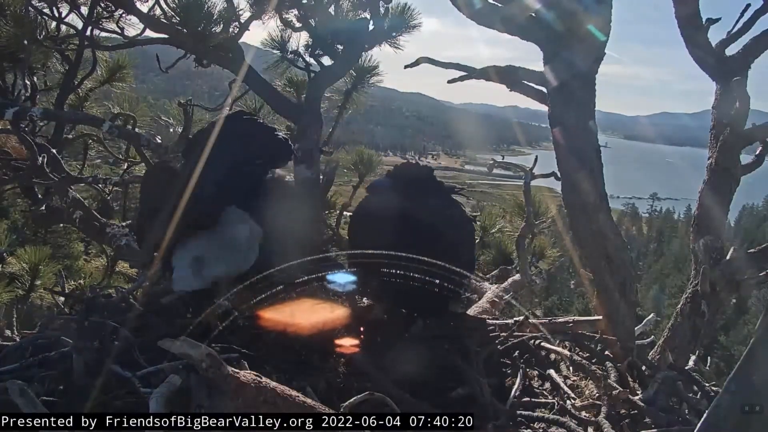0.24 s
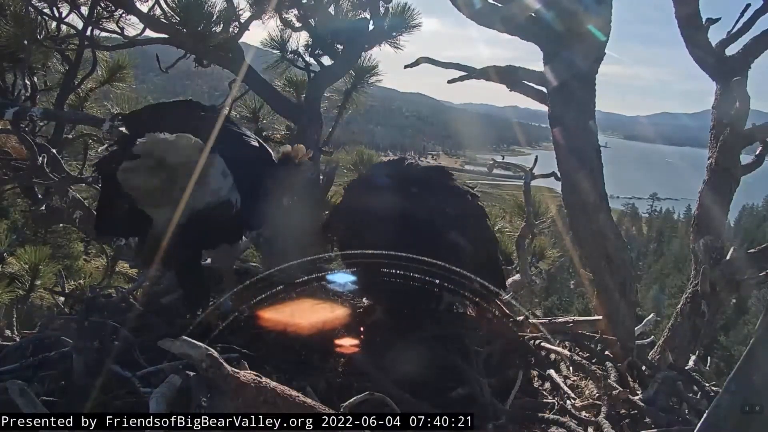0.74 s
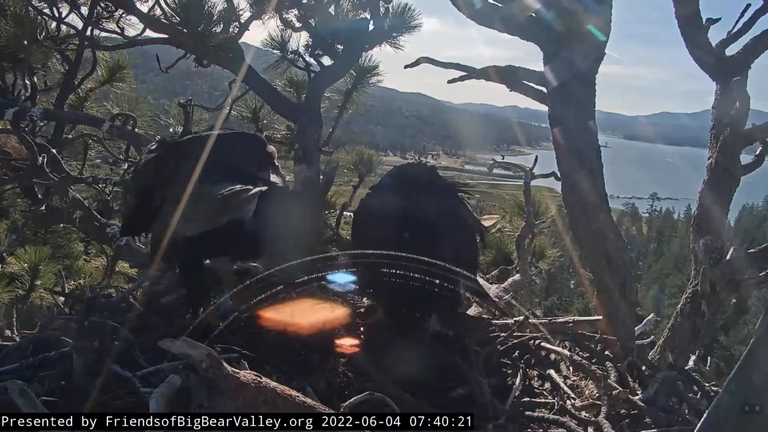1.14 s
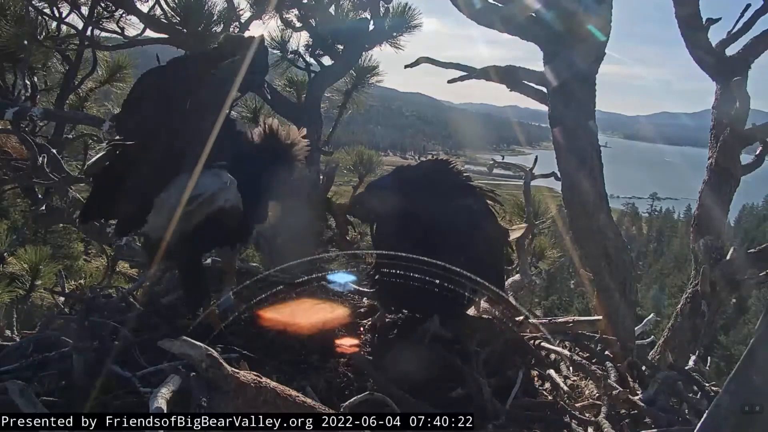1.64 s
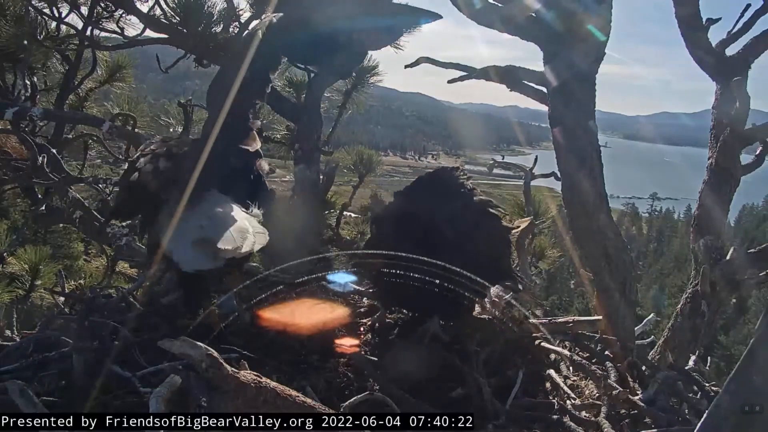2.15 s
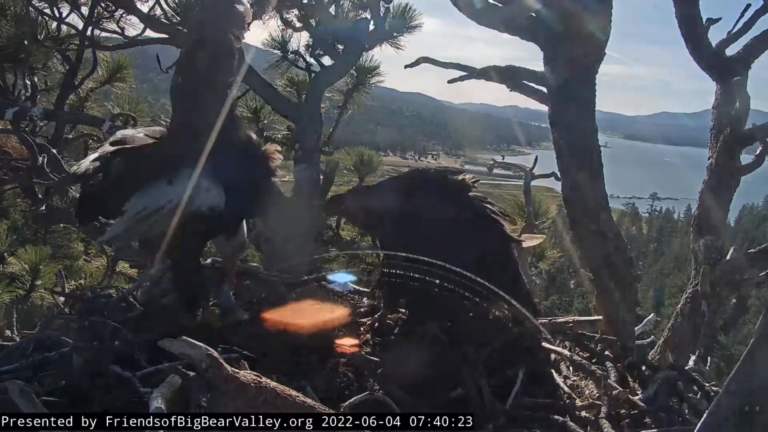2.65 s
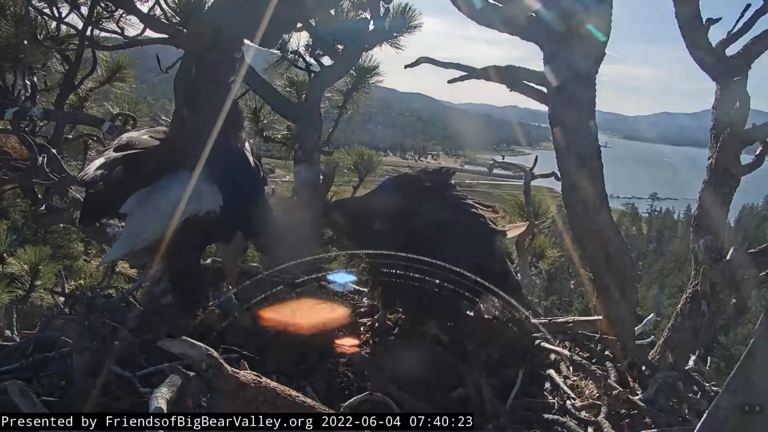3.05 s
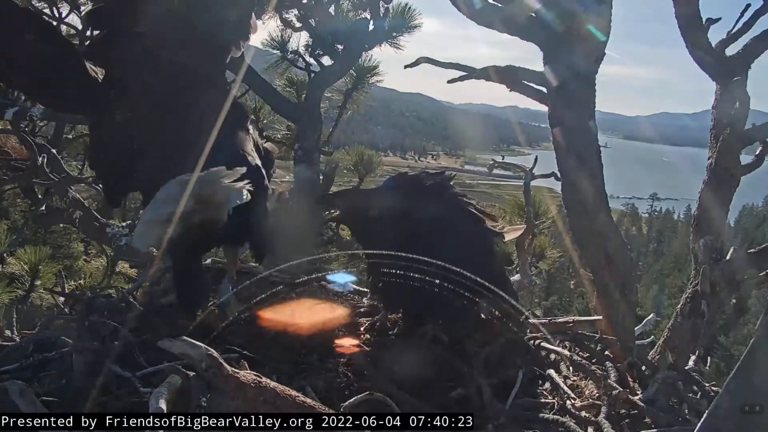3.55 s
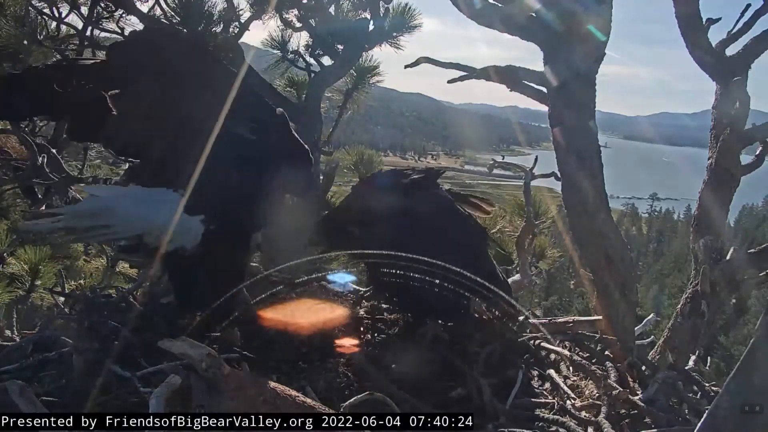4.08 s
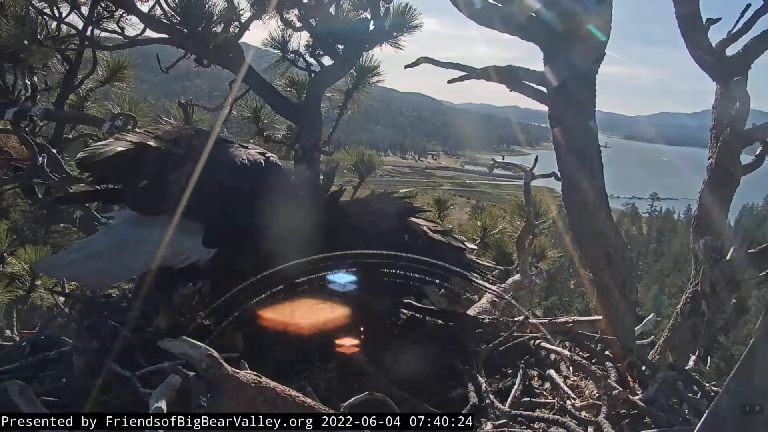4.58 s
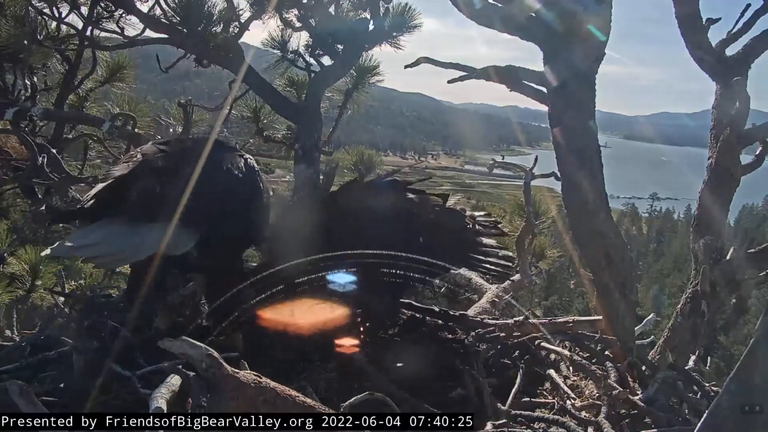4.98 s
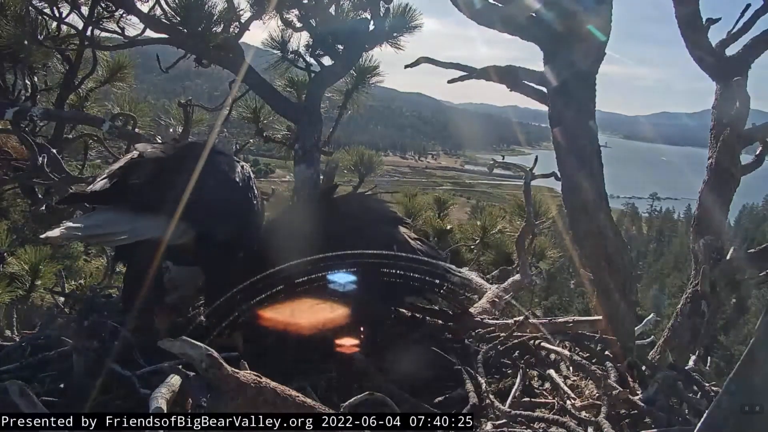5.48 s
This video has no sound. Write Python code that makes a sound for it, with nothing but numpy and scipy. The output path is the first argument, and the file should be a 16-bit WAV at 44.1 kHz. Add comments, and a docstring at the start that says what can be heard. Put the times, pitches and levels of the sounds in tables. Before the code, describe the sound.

A young eagle on a treetop nest squeals over and over, each shrill hoarse cry swooping up and snapping off in a yelp.

```python
"""Long begging squeals from a young eagle on a treetop nest: they swoop up, break to a higher, hoarse register
and drop off in a yelp. We start inside one squeal and leave inside another. Twigs crack under the birds, the
forest returns a faint echo, small birds chirp far off and a low rumble drifts underneath. The eagle is a near
sine, rasp noise and steady side notes; twigs are ringing noise bursts, chirps falling sines, rumble and hiss
shaped noise. The nest microphone's sample clock slips, which adds faint mirror whistles to every squeal."""
import sys
import numpy as np
from scipy import signal
from scipy.fft import rfft, irfft
from scipy.io import wavfile
from scipy.ndimage import uniform_filter1d, map_coordinates

SR = 44100
rng = np.random.default_rng(int(sys.argv[2]) if len(sys.argv) > 2 else 0)


def to_wav(s):
    """Save 16-bit WAV."""
    ch = np.atleast_2d(s).T  # columns
    pcm = np.round(np.clip(ch, -1, 1) * 32767)  # PCM
    wavfile.write(sys.argv[1], SR, pcm.astype(np.int16))


N = 252252
TIME = np.arange(N) / SR

# All levels in the tables are relative; pitches are centres about which the voices waver.
# held note of each squeal in turn: (time [s], pitch [Hz], whistle level [dB], rasp level [dB])
NOTE_1 = [(0.0, 4506, -20.5, -21), (0.033, 4386, -21, -27.5)]
NOTE_2 = [(0.383, 3161, -12.5, -26.5), (0.432, 3560, -30, -67), (0.452, 3566, -17, -62.0),
          (0.511, 3686, -22.5, -61), (0.519, 4110, -28.5, -44), (0.546, 4022, -21, -51),
          (0.598, 3991, -23.5, -24.5), (0.724, 3964, -16, -36.0), (0.751, 4127, -26.5, -28),
          (0.883, 4203, -28, -35.5), (0.91, 4208, -16.5, -22), (0.965, 4360, -18, -30)]
NOTE_3 = [(1.311, 3634, -20.5, -36.5), (1.349, 3733, -28.0, -32), (1.402, 3610, -20, -56.0),
          (1.434, 3630, -27.5, -26.5), (1.483, 3722, -31, -25.5), (1.546, 3561, -25.5, -27.5),
          (1.578, 3614, -19, -28.5), (1.6, 3958, -33.0, -29.0), (1.61, 3833, -23.5, -30),
          (1.746, 3847, -17.0, -23.5), (1.836, 4130, -22.5, -28), (1.908, 4206, -16, -25.5)]
NOTE_4 = [(2.272, 3106, -9.5, -29.5), (2.285, 3457, -14, -31), (2.321, 3270, -22.5, -29.0),
          (2.352, 3286, -12.5, -69), (2.382, 3330, -18, -25), (2.412, 3227, -17.5, -47),
          (2.514, 3446, -11, -47.5), (2.53, 3760, -22.5, -31), (2.664, 3856, -25.5, -30.5),
          (2.735, 3757, -24.5, -32), (2.8, 4023, -16, -41), (2.831, 3904, -22, -30.5)]
NOTE_5 = [(3.191, 2830, -15.5, -41), (3.198, 3378, -15, -28), (3.24, 3277, -23.5, -40),
          (3.272, 3092, -16.5, -52.5), (3.34, 3602, -11.0, -68), (3.37, 3690, -26.5, -37),
          (3.377, 3831, -20, -33), (3.505, 3945, -21, -28), (3.564, 4150, -39.5, -22.5),
          (3.612, 4327, -33, -19.5), (3.637, 4430, -40.5, -26.0), (3.714, 4372, -26, -30.0)]
NOTE_6 = [(3.973, 3993, -27.5, -29), (4.028, 3573, -27, -37.5), (4.081, 4325, -38.5, -39),
          (4.096, 4420, -48.5, -42), (4.103, 4058, -38, -46), (4.133, 3975, -24.5, -36.0),
          (4.153, 4614, -41, -34.5), (4.211, 4540, -43, -36), (4.308, 4326, -29, -30.5),
          (4.37, 4310, -23, -44.5), (4.439, 4513, -37, -27)]
NOTE_7 = [(4.649, 3379, -32.5, -36), (4.697, 3452, -23, -53), (4.705, 3408, -29.5, -33.5),
          (4.722, 3765, -24.5, -35), (4.754, 3701, -29, -38), (4.796, 3513, -23, -32),
          (4.842, 3672, -29, -36.5), (4.934, 3894, -18, -28.5), (4.972, 3853, -29.5, -31)]
NOTE_8 = [(5.284, 2864, -18, -49), (5.313, 2866, -15, -53), (5.339, 2678, -24, -51), (5.37, 2620, -18, -61),
          (5.43, 2752, -30, -68), (5.455, 2773, -22, -52), (5.463, 3202, -29, -39),
          (5.506, 3349, -18.5, -35), (5.592, 3389, -17.5, -44), (5.6, 3751, -29, -40),
          (5.712, 3856, -27, -37)]
HELD_NOTES = [NOTE_1, NOTE_2, NOTE_3, NOTE_4, NOTE_5, NOTE_6, NOTE_7, NOTE_8]
# closing yelps at their loudest; the last squeal has none:
# (time [s], pitch [Hz], whistle level [dB], rasp level [dB], release [s])
YELPS = [(.058, 2926, -8, -30, 0.011), (.988, 2857, -10, -22.5, 0.025), (1.93, 2740, -6, -22, 0.045),
         (2.847, 3612, -10, -22, 0.048), (3.734, 3349, -4.5, -46, 0.0295), (4.46, 3134, -9.5, -21.5, .03),
         (4.987, 3209, -10.5, -20.5, 0.025)]
# scratch, then catch of the tone; the first squeal has none:
# (time [s], scratch level [dB], catch delay [s], catch level [dB], pitch unsteadiness that follows [1 = usual])
OPENINGS = [(.328, -29.5, 0.025, -14.5, .8), (1.271, -27, 0.023, -12, 1.29),
            (2.221, -28, 0.031, -7.5, 0.89), (3.142, -34.5, .03, -15, 0.78),
            (3.929, -34.5, .018, -15, 2.615), (4.611, -34.5, 0.024, -34, 1.065),
            (5.245, -40.5, 0.026, -22.5, 1.26)]
# hoarse bands of the rasp while the whistle is at MID_PITCH_HZ: (frequency [Hz], width [Hz], level [dB])
RASP_BANDS = [(3638, 90, -1), (3347, 160, -6), (2922, 140, -4), (2662, 110, -17.5), (2320, 95, -21),
              (1845, 1400, -38.5)]
# air rushing through the open beak: (frequency [Hz], density [dB per Hz])
BEAK_AIR = [(200, -44), (600, -10), (1200, -17), (2000, -8.5), (3000, -6.5), (3900, -18.5), (4600, -17),
            (7000, -27)]
# reflections from trunks and slopes: (delay [s], level [dB])
ECHOES = [(.0028, -40), (.0071, -14.5), (0.0152, -16.5)]
# low rumble: (frequency [Hz], density [dB per Hz])
LOW_RUMBLE = [(25, -32), (50, -21), (80, -6.5), (115, 0.5), (160, -2.5), (200, -8), (260, -23.5),
              (400, -30.5), (700, -29), (1500, -31.5), (3000, -37.5)]
# hiss of the microphone: (frequency [Hz], density [dB per Hz])
MICROPHONE_HISS = [(300, -19), (2000, -3.5), (5000, -3), (9000, -1), (13000, -1), (14500, -23),
                   (16000, -86)]
# faint dry ticks: (time [s], level [dB])
TICKS = [(0.1486, -15.5), (1.378, -16.5), (3.0178, -23.5), (3.8384, -22.5), (4.6698, -17), (5.0778, -10)]
# colour of the opening scratch: (frequency [Hz], density [dB per Hz])
SCRATCH_COLOUR = [(250, -10), (600, 7), (1100, 3), (1700, 11.5), (2900, -7), (3600, 3), (6000, -37)]
# steady note pairs from the second side of the syrinx:
# (start [s], end [s], upper pitch [Hz], upper level [dB], lower pitch [Hz], lower level [dB])
SECOND_VOICE = [(0.57, 0.672, 3610, -26, 2980, -39), (0.674, 0.796, 2943, -35, 2665, -33.5),
                (0.842, 0.926, 3654, -26.5, 2950, -38), (1.425, 1.609, 3060, -30.5, 2945, -31.5),
                (1.62, 1.914, 3606, -38, 2878, -29.5), (2.527, 2.837, 3365, -27.5, 2867, -35),
                (3.523, 3.678, 3577, -25, 3000, -24.5), (3.971, 4.425, 3700, -40, 3288, -45.5),
                (4.771, 4.951, 3274, -34.5, 2580, -35), (5.013, 5.055, 3216, -23.5, 2540, -36.5)]
# twig cracks: (time [s], level [dB])
CRACKS = [(1.701, -11.5), (1.722, -18), (1.748, -8), (1.771, -12.5), (1.775, -20), (1.787, -31),
          (1.802, -14), (2.378, -21.5), (2.599, -24), (4.062, -34)]
# resonances of a snapping twig: (frequency [Hz], width [Hz], level [dB])
TWIG_RESONANCES = [(636, 570, -8), (1250, 960, -6), (2000, 430, -1), (2820, 190, 5)]
# chirps of far birds: (time [s], pitch [Hz], level [dB])
CHIRPS = [(4.105, 5550, -44.5), (4.214, 5460, -41), (4.355, 5810, -46), (4.491, 5400, -44.5),
          (4.66, 5370, -47), (5.052, 1367, -45), (5.154, 1383, -37), (5.401, 1776, -39),
          (5.535, 1350, -38.5), (5.68, 1750, -41)]

MID_PITCH_HZ = 4002
SILENT_DB = -90
# swoop: swells from a low pitch to the catch and stays strong for a moment; dB relative to the catch
SWOOP_HZ, CATCH_HZ, CATCH_RISE_HZ_PER_S = 2400, 2854, 11000
ATTACK_S, ATTACK_DB, CATCH_HOLD_S, CATCH_SAG_DB, CATCH_RASP_DB = .012, 23, .008, 1, -25
# yelp: drops to the bottom of the voice, weakens and dies, whistle still above the rasp;
# bottom levels relative to the whistle at its peak
YELP_FALL_HZ_PER_S, BOTTOM_HZ, BOTTOM_DB = 50000, 2536, -13
BOTTOM_RASP_DB, RELEASE_DB = -20, 42
# the microphone's clock and the upper limit of its band
CLOCK_HZ, CUTOFF_HZ = 48000, 15900


def from_db(db):
    """Decibels to gain."""
    return 10 ** (np.asarray(db) / 20)


def rms_one(x):
    """Scale to unit power."""
    return x / np.sqrt(np.mean(np.abs(x) ** 2) + 1e-20)


def drift(rate_hz):
    """Smooth random wobble of spread 1: noise through two equal low-pass poles."""
    pole = np.exp(-2 * np.pi * rate_hz / SR)
    noise = rng.standard_normal(N + SR)
    # the first second only settles the filter
    return rms_one(signal.lfilter([1], [1, -2 * pole, pole * pole], noise)[SR:])


def bounded_drift(rate_hz):
    """A wobble whose rare large swings are rounded off."""
    return 2 * np.tanh(drift(rate_hz) / 2)


def coloured_noise(spectrum):
    """Noise of unit power with the given spectrum."""
    hz, level_db = np.transpose(spectrum)
    bins = np.maximum(np.fft.rfftfreq(N, 1 / SR), 1)
    gain = from_db(np.interp(np.log(bins), np.log(hz), level_db))
    return rms_one(irfft(rfft(rng.standard_normal(N)) * gain, N))


def resonate(x, hz, width_hz):
    """One resonance with gain 1 on top."""
    r = np.exp(-np.pi * width_hz / SR)
    numerator = np.array([1, 0, -1]) * (1 - r * r) / 2
    denominator = [1, -2 * r * np.cos(2 * np.pi * hz / SR), r * r]
    return signal.lfilter(numerator, denominator, x)


def phase_of(hz):
    """Running phase of a moving frequency."""
    return 2 * np.pi * np.cumsum(hz) / SR


def eagle(whistle_db=-0.7, rasp_db=-2.0):
    """Two voices, opening scratches and a rasp whose share sets the hoarseness."""
    pitch, tone_gain, rasp_gain = squeal_controls()
    hoarse = rasp_gain / (np.hypot(tone_gain, rasp_gain) + 1e-6)
    voices = from_db(whistle_db) * tone_gain * whistle(pitch, hoarse) + second_voice()
    return voices + from_db(rasp_db) * rasp_gain * rasp(pitch) + scratches()


def squeal_controls():
    """Pitch, whistle gain and rasp gain: swoops, held notes and yelps joined in order of time."""
    swoops = [swoop(s, delay_s, db) for s, _, delay_s, db, _ in OPENINGS]
    yelps = [yelp(*row) for row in YELPS]
    course = np.vstack(swoops + HELD_NOTES + yelps)
    s, pitch, whistle_db, rasp_db = course[np.argsort(course[:, 0])].T
    tone_gain = from_db(np.interp(TIME, s, whistle_db))
    rasp_gain = from_db(np.interp(TIME, s, rasp_db))
    return np.interp(TIME, s, pitch), tone_gain, rasp_gain


def whistle(pitch, hoarse, waver=0.00306, jitter=0.00844, hop=0.0149,  # shares of the pitch
            swell_db=2.16, stumble_db=4.5, shimmer_db=2.0, overtone_db=-39, slack_hz=2620, half_db=-6):
    """The syrinx sings a near sine; as it turns hoarse it shakes and hops between neighbouring pitches."""
    starts, *_, unsteadiness = np.transpose(OPENINGS)
    of_squeal = unsteadiness[np.maximum(np.searchsorted(starts, TIME) - 1, 0)]
    # the squashed drift lingers near two extremes, heard as hops
    hops = hop * np.tanh(2 * drift(49.6))
    unsteady = of_squeal * hoarse ** 2 * (jitter * drift(201.5) + hops)
    phase = phase_of(pitch * (1 + waver * drift(36.2) + unsteady))
    hoarse_shake_db = hoarse * (stumble_db * bounded_drift(69) + shimmer_db * drift(99))
    shake = from_db(swell_db * drift(74) + hoarse_shake_db)
    # a slack membrane doubles its period and adds the octave below
    slack = np.clip((slack_hz - pitch) / 200, 0, 1)
    octave_below = slack * from_db(half_db) * np.sin(phase / 2)
    wave = np.sin(phase) + from_db(overtone_db) * np.sin(2 * phase) + octave_below
    return np.sqrt(2) * shake * glide_flare(pitch) * wave


def glide_flare(pitch, spacing_hz=720, wide_db=3.0, narrow_db=3.0, fast_glide=7):  # fast_glide in 1/s
    """A fast glide flares each time it crosses one of the evenly spaced resonances of the path."""
    relative_speed = np.abs(np.gradient(np.log(pitch))) * SR
    glide = uniform_filter1d(np.tanh(relative_speed / fast_glide), size=300)
    turn = 2 * np.pi * pitch / spacing_hz
    return from_db(glide * (wide_db * np.cos(turn) + narrow_db * np.cos(2 * turn) - 3))


def rasp(pitch, follow=0.41, wander=.008, patchy_db=5.0, air_db=-13, flutter_hz=330, flutter_depth=0.74):
    """Irregular side vibrations lie under the whistle, follow it partly and flutter with the rushing air."""
    tension = (pitch / MID_PITCH_HZ) ** follow
    out = from_db(air_db) * coloured_noise(BEAK_AIR)
    for hz, width_hz, level_db in RASP_BANDS:
        phase = phase_of(hz * tension * (1 + wander * drift(5.4)))
        # slow noise on both quadratures makes a band of noise about the moving centre
        band = drift(width_hz / 2) * np.cos(phase) + drift(width_hz / 2) * np.sin(phase)
        out = out + from_db(level_db + patchy_db * bounded_drift(16.6)) * band
    # the side vibrations share one stream of air, so their sum stays even
    out = out / np.sqrt(np.maximum(uniform_filter1d(out ** 2, size=700), 1e-9))
    flutter = 1 + flutter_depth * np.sin(phase_of(flutter_hz * (1 + 0.19 * drift(60.57))))
    return rms_one(out * flutter)


def forest(x, tail_db=-29, t60_s=3.9, far_s=0.16, build_s=0.027):
    """A few near reflections, then a thin diffuse echo from trees further off."""
    near = sum(from_db(db) * np.interp(TIME - delay, TIME, x, left=0) for delay, db in ECHOES)
    # the response is cut off at 2 s
    t = np.maximum(TIME[:2 * SR] - far_s, 0)
    build_up = 1 - np.exp(-t / build_s)
    tail = rng.standard_normal(len(t)) * from_db(-60 * t / t60_s) * build_up
    return near + from_db(tail_db) * signal.fftconvolve(x, tail / np.linalg.norm(tail))[:N]


def low_rumble(rumble_db=-41, swing_db=0.5):
    """Low noise whose level drifts slightly."""
    return from_db(rumble_db + swing_db * drift(4.0)) * coloured_noise(LOW_RUMBLE)


def microphone_hiss(hiss_db=-50):
    """Even noise floor of the microphone."""
    return from_db(hiss_db) * coloured_noise(MICROPHONE_HISS)


def yelp(peak_s, hz, level_db, peak_rasp_db, release_s, sag_hz=330):
    """From its peak the voice falls to its bottom pitch, weakens and sags away: rows as in HELD_NOTES."""
    bottom_s = peak_s + abs(hz - BOTTOM_HZ) / YELP_FALL_HZ_PER_S
    tone_db, rasp_db = level_db + BOTTOM_DB, level_db + BOTTOM_RASP_DB
    return [(peak_s, hz, level_db, peak_rasp_db),
            (bottom_s, BOTTOM_HZ, tone_db, rasp_db),
            (bottom_s + release_s, BOTTOM_HZ - sag_hz, tone_db - RELEASE_DB, rasp_db - RELEASE_DB),
            (bottom_s + 2 * release_s, BOTTOM_HZ - sag_hz, SILENT_DB, SILENT_DB)]


def ticks():
    """Clicks one sample long."""
    out = np.zeros(N)
    for s, db in TICKS:
        out[round(s * SR)] = from_db(db)
    return out


def scratches(rise_s=0.0013, decay_s=0.01):
    """Broad noise leaves the throat before the tone catches."""
    height = np.zeros(N)
    for s, db, *_ in OPENINGS:
        rise = np.clip((TIME - s) / rise_s, 0, 1)
        height += from_db(db) * rise * np.exp(-np.abs(TIME - s) / decay_s)
    return height * coloured_noise(SCRATCH_COLOUR)


def swoop(start_s, delay_s, level_db):
    """The tone swells at a low pitch, catches and climbs: rows as in HELD_NOTES."""
    catch_s, rasp_db = start_s + delay_s, level_db + CATCH_RASP_DB
    held_hz = CATCH_HZ + CATCH_RISE_HZ_PER_S * CATCH_HOLD_S
    return [(start_s, SWOOP_HZ, SILENT_DB, SILENT_DB),
            (catch_s - ATTACK_S, SWOOP_HZ, level_db - ATTACK_DB, rasp_db),
            (catch_s, CATCH_HZ, level_db, rasp_db),
            (catch_s + CATCH_HOLD_S, held_hz, level_db - CATCH_SAG_DB, rasp_db)]


def second_voice(level_db=-1.5, waver=0.00644, swell_db=4.0, fade_s=0.016):
    """Weaker clean notes under the whistle beat against it; upper and lower swell on their own."""
    out = np.zeros(N)
    wobble = 1 + waver * drift(46)
    swells_db = swell_db * np.array([bounded_drift(26), bounded_drift(45)])
    for start, end, upper_hz, upper_db, lower_hz, lower_db in SECOND_VOICE:
        on = (TIME >= start) & (TIME < end)
        fade = np.clip(np.minimum(TIME[on] - start, end - TIME[on]) / fade_s, 0, 1)
        for k, (hz, db) in enumerate([(upper_hz, upper_db), (lower_hz, lower_db)]):
            gain = fade * from_db(level_db + db + swells_db[k, on])
            out[on] += gain * np.sin(phase_of(hz * wobble[on]))
    return out


def twigs(level_db=6, decay_s=0.0038):
    """Dry sticks snap in dying noise bursts and ring very briefly."""
    height = np.zeros(N)
    for s, db in CRACKS:
        height += from_db(db) * (TIME >= s) * np.exp(-np.abs(TIME - s) / decay_s)
    snap = height * rng.standard_normal(N) + 1e-18
    ringing = np.zeros(N)
    for k, (hz, width_hz, db) in enumerate(TWIG_RESONANCES):
        # neighbouring resonances have opposite sign
        ringing += (-1) ** k * from_db(db) * resonate(snap, hz, width_hz)
    return from_db(level_db) * ringing


def far_birds(length_s=.014, fall_per_s=3):
    """Short falling chirps, blurred by distance into soft-edged bells of level."""
    out = np.zeros(N)
    wobble = 1 + .018 * drift(200)
    for s, hz, level_db in CHIRPS:
        near = np.abs(TIME - s) < 4 * length_s
        t = TIME[near] - s
        bell = from_db(level_db) * np.exp(-(t / length_s) ** 2)
        out[near] += bell * np.sin(phase_of(hz * wobble[near] * (1 - fall_per_s * t)))
    return out


def scene():
    """The nest, its echo and the surroundings."""
    nest = eagle() + twigs()
    surroundings = far_birds() + low_rumble() + microphone_hiss() + ticks()
    return (nest + forest(nest) + surroundings)[None]


def record(dry):
    """Samples of a faster clock are dropped without smoothing, which mirrors each tone; the top is cut."""
    fine = signal.resample_poly(dry[0], up=2, down=1)
    # each output sample takes the nearest tick of the faster clock
    held_s = np.round(TIME * CLOCK_HZ) / CLOCK_HZ
    slipped = map_coordinates(fine, [held_s * 2 * SR], order=3, mode="nearest")
    top_cut = signal.ellip(10, .1, 90, CUTOFF_HZ, fs=SR, output="sos")
    return signal.sosfilt(top_cut, slipped)[None]


dry = scene()
out = record(dry)
to_wav(out)
```